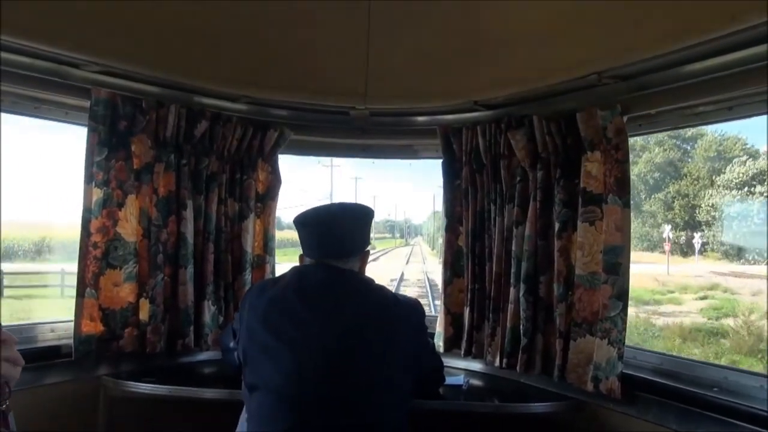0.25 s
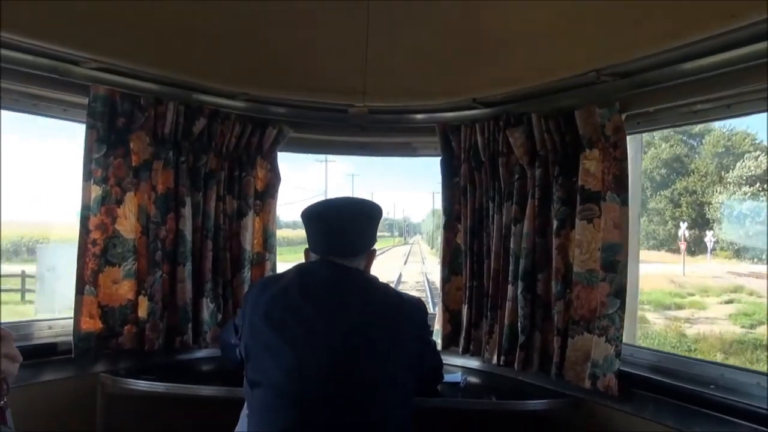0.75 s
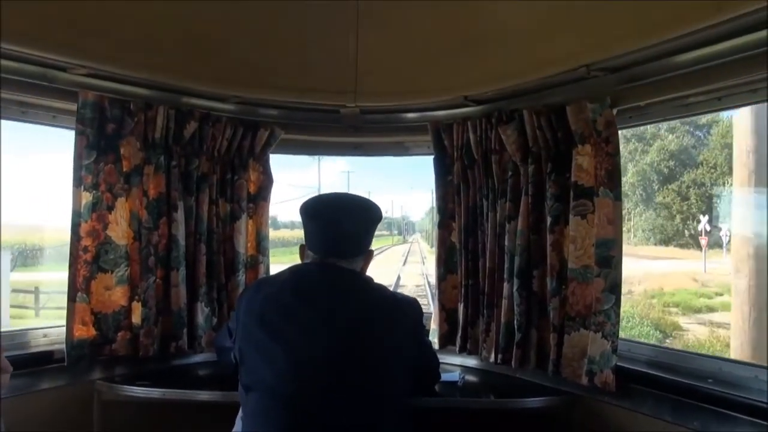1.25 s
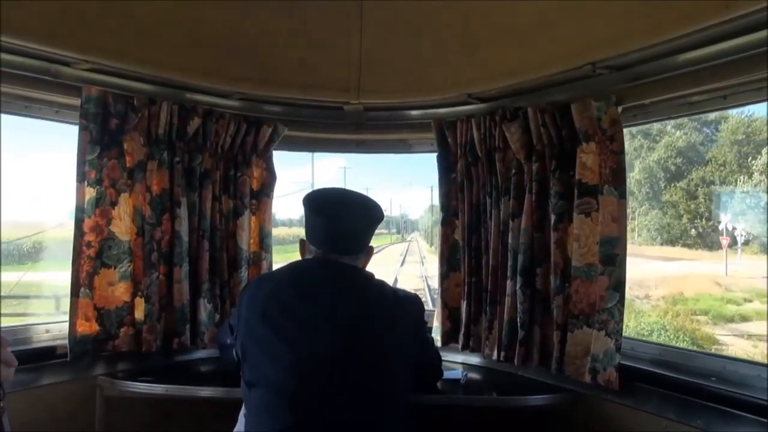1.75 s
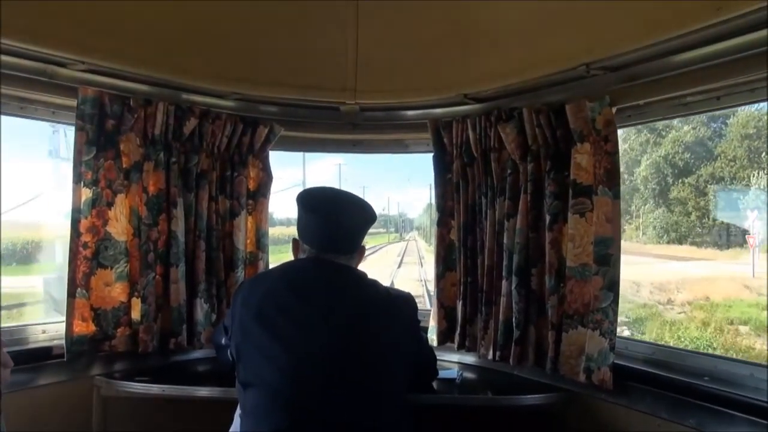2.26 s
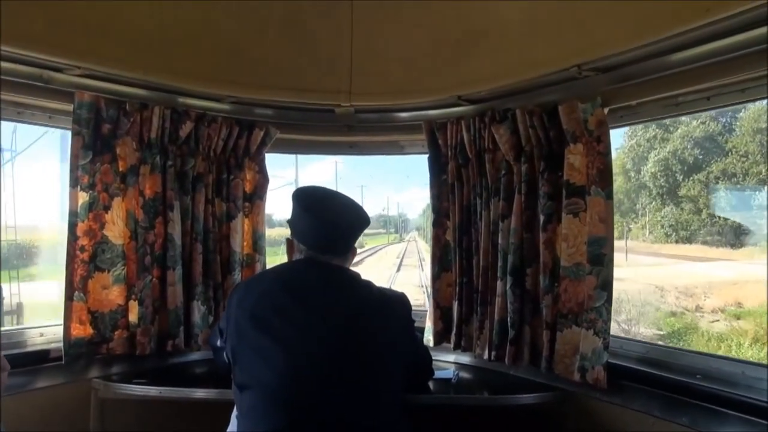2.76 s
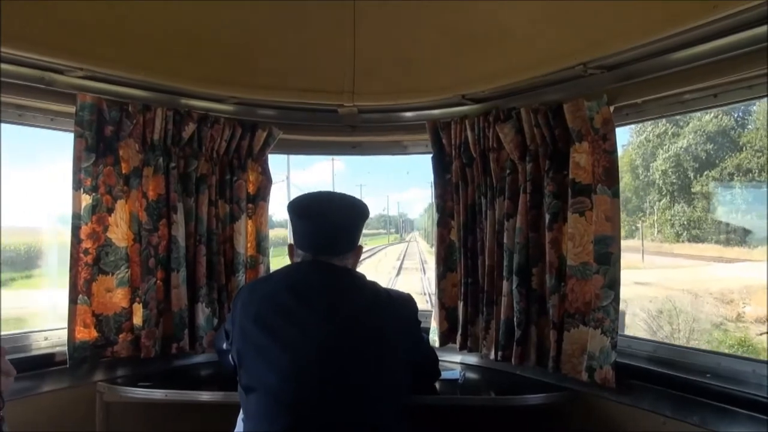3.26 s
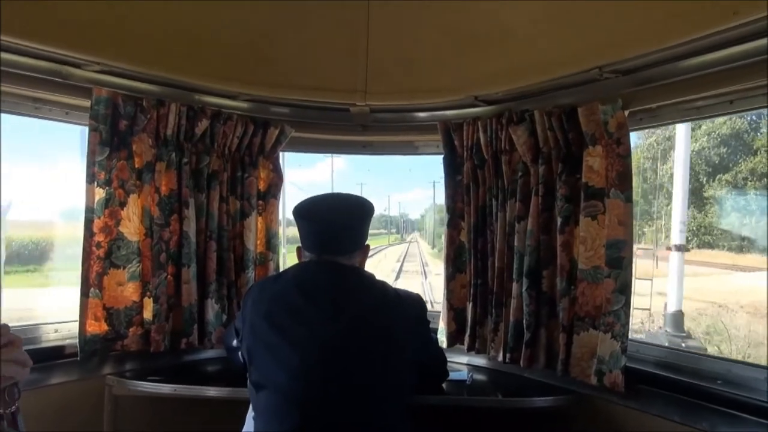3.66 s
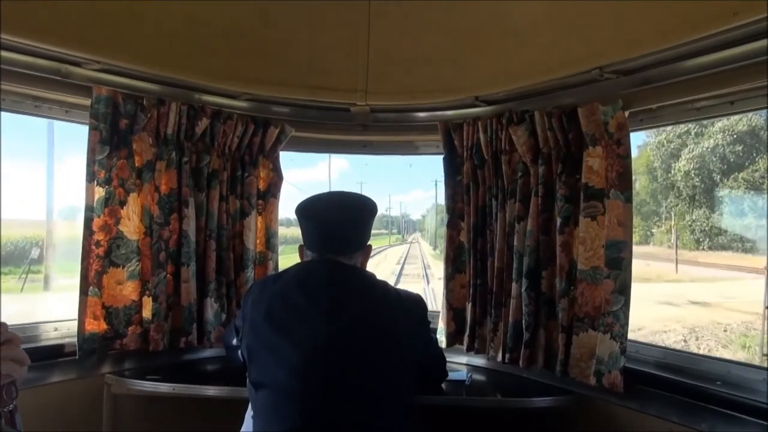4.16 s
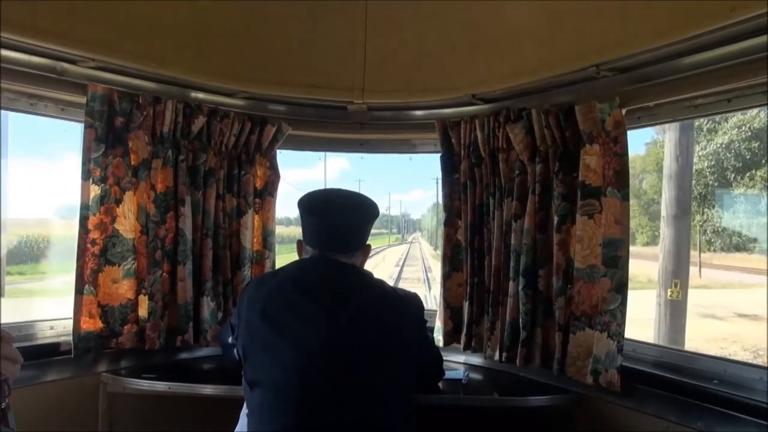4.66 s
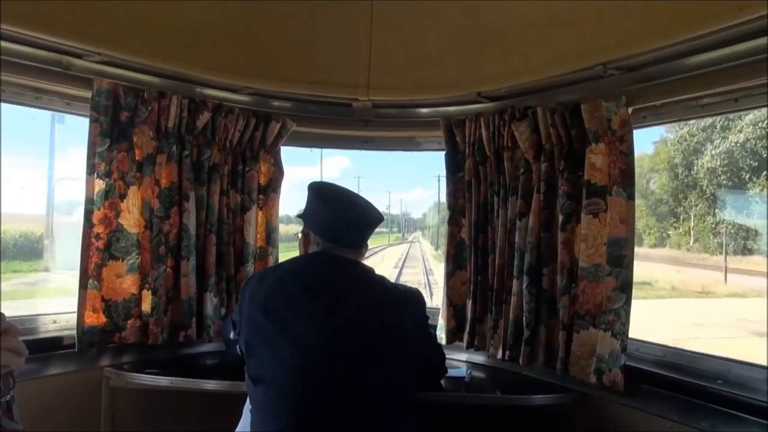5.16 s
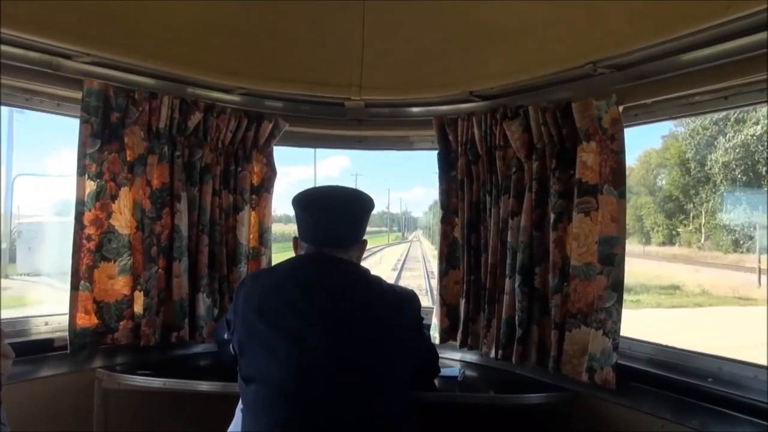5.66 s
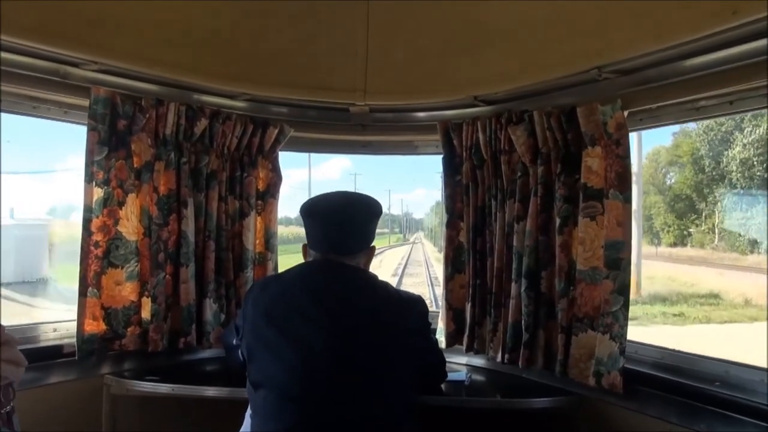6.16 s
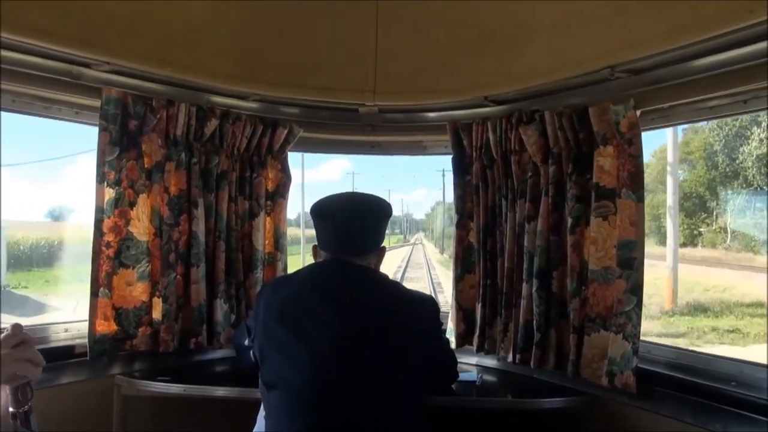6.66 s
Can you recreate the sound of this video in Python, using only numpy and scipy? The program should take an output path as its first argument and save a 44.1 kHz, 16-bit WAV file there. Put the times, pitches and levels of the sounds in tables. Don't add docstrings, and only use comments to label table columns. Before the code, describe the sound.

In a small railcar cab, compressed air rushes from the brake valve, already at full force, a bright sizzling hiss coloured by the close walls. It holds for a second or so, then steadily weakens to the end. Far beneath, a motor rises slightly in pitch and settles into a faint steady whine, with low wheel rumble and soft joint thuds. A small camera microphone listens from behind, almost centred.

```python
import sys
import numpy as np
from scipy import signal
from scipy.fft import rfft, irfft, next_fast_len
from scipy.io import wavfile
from scipy.ndimage import uniform_filter1d, map_coordinates

SR = 44100
rng = np.random.default_rng(int(sys.argv[2]) if len(sys.argv) > 2 else 0)


def to_wav(sig):
    pcm = np.clip(np.atleast_2d(sig), -1, 1) * 32767
    pcm = np.round(pcm).astype(np.int16)
    wavfile.write(sys.argv[1], SR, pcm.T)


def field_ratio(decibels):
    return 10 ** (np.asarray(decibels, dtype=float) / 20)


N = 305480
TIME = np.arange(N) / SR


def along(points, hz):
    point_hz, value = np.transpose(points)
    return np.interp(np.log(hz + 1), np.log(point_hz + 1), value)


def curves(rows):
    seconds, *columns = np.transpose(rows)
    return [np.interp(TIME, seconds, column) for column in columns]


def bump(x, centre, width):
    return np.exp(-((x - centre) / width) ** 2)


def unit(x):
    return x / np.sqrt(np.mean(x ** 2) + 1e-20)


def wobble(knots_per_s):
    knots = rng.standard_normal(int(N * knots_per_s / SR) + 4)
    return map_coordinates(knots, [TIME * knots_per_s])


def filtered(x, gain):
    size = next_fast_len(N + 8192)
    hz = np.fft.rfftfreq(size, 1 / SR)
    return irfft(rfft(x, size) * gain(hz), size)[..., :N]


# frequency in Hz, side minus mid in dB.
PORT_SIDE_DB = [(60, -25), (400, -22.5), (1200, -30.5), (3000, -26), (5500, -18.5), (7000, -17.5),
                (9000, -12), (11300, -10), (11800, -22), (15500, -29)]
# frequency in Hz, likeness of side to mid from -1 to 1 (above 0 pulls left).
PORT_LEAN = [(200, -.3), (5500, -0.22), (7500, 0.029), (11000, 0.45)]


def turbulence(patchy_db):
    z = signal.stft(rng.standard_normal((2, N)), nperseg=512)[2]
    patches = rng.standard_normal(z.shape[1:])
    patches = uniform_filter1d(patches, size=14, axis=0)
    patches = uniform_filter1d(patches, size=8, axis=1)
    mid, other = signal.istft(z * field_ratio(patchy_db * unit(patches)), nperseg=512)[1][:, :N]

    def lean(hz):
        return np.clip(along(PORT_LEAN, hz), -1, 1)

    def side_gain(hz):
        return field_ratio(along(PORT_SIDE_DB, hz))

    tied = filtered(mid, lambda hz: lean(hz) * side_gain(hz))
    free = filtered(other, lambda hz: np.sqrt(1 - lean(hz) ** 2) * side_gain(hz))
    side = tied + free
    return np.array([mid + side, mid - side])


def reflections(x, ripple_db):
    z = signal.stft(x, nperseg=2048)[2]
    comb = rng.standard_normal(z.shape[1:])
    for _ in range(2):
        comb = uniform_filter1d(comb, size=2, axis=0)
        comb = uniform_filter1d(comb, size=30, axis=1)
    return signal.istft(z * field_ratio(ripple_db * unit(comb)), nperseg=2048)[1][:, :N]


# time in seconds, jet level in dB.
VENT_DB = [(0, -31.5), (.1, -31.7), (.32, -31), (.42, -32), (.65, -31), (.85, -32), (1.3, -33), (2.0, -33),
           (2.6, -33.5), (3.4, -35.5), (4.1, -36), (4.7, -37.5), (5.35, -38.5), (6.93, -42)]
# frequency in Hz, density in dB per Hz.
JET_COLOUR = [(200, -27.5), (280, -26), (450, -10.5), (850, -30.5), (1100, -25.5), (1700, -22.5),
              (2700, -13), (4000, -5.5), (6000, -0.5), (7500, -5), (9500, -4.5), (12000, -8),
              (14000, -11.5), (15650, -18.0)]
# centre in Hz, width in Hz, gain in
# dB.
CAB_MODES = [(459, 104, -11.9), (792, 99, -4.0), (901, 292, 12.0), (1346, 342, 9.3), (1603, 155, 6.5),
             (1875, 174, 12.0), (2037, 176, 8.1), (2418, 89, 5.6), (2604, 88, 2.1), (3072, 61, -4.5),
             (3391, 41, 3.6), (3695, 94, -4.3), (4041, 91, -3.9), (4714, 249, -9.4), (4844, 434, 12.0),
             (4957, 187, -8.9), (5226, 94, -4.0), (5898, 499, -3.2), (6570, 82, -3.4), (7132, 125, -9.0),
             (7147, 435, 12.0), (7629, 63, -3.3), (8026, 83, 3.6), (8374, 267, 5.1), (8549, 107, -4.6),
             (10597, 224, 3.8), (11274, 194, -5.6), (11363, 359, 3.7),
             (5480, 160, 1.1), (6020, 92, 1), (6530, 120, 1.5), (7270, 66, 0.8), (8600, 120, 2.2),
              (9050, 82, 0.5), (9960, 630, 0.9), (11060, 100, 0.5)]


def brake_air():
    jet_db, = curves(VENT_DB)
    focus = bump(TIME, centre=2.2, width=1.2)
    edge_loss_db, body_loss_db = 0.9, 1
    opening_db, opening_s = 2.5, 0.4
    edge_db = opening_db * bump(TIME, 0, opening_s) - edge_loss_db * focus + 0.54 * wobble(5)
    body_db = 0.64 * wobble(4.08) - body_loss_db * focus

    def colour(hz):
        broad_db = along([(120, -56)] + JET_COLOUR, hz)
        modes_db = sum(db / (1 + (2 * (hz - centre_hz) / width_hz) ** 2)
                       for centre_hz, width_hz, db in CAB_MODES)
        return field_ratio(broad_db + modes_db)

    air = filtered(reflections(turbulence(patchy_db=0.61), ripple_db=1.41), colour)

    def above(corner_hz):
        return filtered(air, lambda hz: 1 - 1 / (1 + (hz / corner_hz) ** 8))

    def drift(db):
        return db - np.mean(db)

    body = air - above(3500)
    edge = above(9600)
    fizz = above(13000)
    core = air - body - edge
    edge = edge + (field_ratio(0.19 * drift(jet_db)) - 1) * fizz
    flutter_db = 0.16 * wobble(12) + 0.23 * wobble(30) + 0.36 * wobble(80)
    jet = core + field_ratio(drift(edge_db)) * edge + field_ratio(drift(body_db)) * body
    return field_ratio(jet_db + 0.62 + flutter_db) * jet / np.std(core)


# time in seconds, shaft rate in Hz.
SHAFT_HZ = [(0, 37.0), (.25, 37.15), (.33, 37.45), (.45, 38.05), (.6, 38.33), (.9, 38.4), (4.5, 38.39),
            (5.5, 38.37), (6.93, 38.36)]
# time in seconds, level of shaft order 9 in dB.
NINTH_DB = [(0, -73), (.2, -66.5), (.33, -57.5), (.75, -61.5), (1.1, -72), (1.6, -64.5), (2, -67.5),
            (2.3, -65.5), (2.9, -70.5), (3.4, -70), (3.9, -64.5), (4.6, -71), (5, -69.5), (5.5, -71.5),
            (6.2, -72), (6.93, -67)]


def motor():
    shaft_hz, = curves(SHAFT_HZ)
    ninth_db, = curves(NINTH_DB)
    swell_db = 4.5 * bump(TIME, centre=2.4, width=0.45)
    dip_db = 5 * bump(10 * shaft_hz, centre=374.8, width=4)
    tenth_db = -72.5 + swell_db + 2.4 * wobble(2.73) - dip_db - 0.53 * TIME
    panel_db = 11.5 * bump(18 * shaft_hz, centre=691, width=3.1)
    easing_db_per_s = 1.34
    eighteenth_db = -75.5 + panel_db - easing_db_per_s * TIME
    order_db = {9: ninth_db, 10: tenth_db, 18: eighteenth_db, 20: tenth_db - 4.0, 27: ninth_db - 18}

    shaft_angle = 2 * np.pi * np.cumsum(shaft_hz) / SR
    run_up = bump(TIME, centre=0.38, width=0.22)
    whine = 0
    for order, db in order_db.items():
        right_db = 0.91 + 0.37 * wobble(1.27) + 2.0 * run_up
        level = field_ratio(db + 0.49 * wobble(3.5)) * np.sqrt(2)
        tone = level * np.sin(order * shaft_angle + rng.uniform(0, 2 * np.pi))
        whine = whine + tone * field_ratio(np.array([-right_db, right_db]))
    return whine


# time in seconds, rumble level in dB.
RUMBLE_DB = [(0, -68), (.3, -73), (.75, -67), (.95, -72), (2.4, -71.5), (5.4, -73), (5.75, -80),
             (6.93, -81)]
# frequency in Hz, rumble density in dB per Hz.
RUMBLE_COLOUR = [(13, -40), (22, -10), (54, -0.5), (135, -2.5), (172, 0.5), (241, -15), (300, -2),
                 (390, -28), (660, -120)]
# time in seconds, peak level in dB, floor or fitting ring in Hz, 60 dB decay in seconds.
RAIL_JOINTS = [(.04, -65, 60, .2), (.6, -66, 147, .15), (.8, -56, 141, 0.15), (.85, -58, 62, 0.28),
               (1.14, -64, 129, .15), (1.92, -58.5, 171, 0.21), (2.15, -67, 167, .15),
               (3.22, -63, 189, 0.18), (3.28, -61, 121, .25), (3.64, -52, 160, 0.11),
               (3.69, -61.5, 71, 0.28), (4.4, -63, 161, 0.17), (4.565, -53, 1000, 0.15),
               (4.665, -61, 755, 0.15), (4.96, -61.5, 187, .3), (5.03, -63, 115, 0.22),
               (5.39, -62, 168, .2), (5.44, -63, 65, 0.27)]


def wheels():
    rumble_db, = curves(RUMBLE_DB)
    rumble = unit(filtered(turbulence(patchy_db=2.0), lambda hz: field_ratio(along(RUMBLE_COLOUR, hz))))
    thuds = np.zeros(N + SR)
    t = TIME[:SR // 2]
    for start_s, peak_db, ring_hz, t60_s in RAIL_JOINTS:
        ring = np.sin(2 * np.pi * ring_hz * t)
        ring += 0.61 * np.sin(2 * np.pi * 1.54 * ring_hz * t + rng.uniform(0, 2 * np.pi))
        decay = field_ratio(peak_db + 3.5 - 60 * t / t60_s)
        soft_onset = 1 - np.exp(-t / 0.01)
        thuds[round(start_s * SR):][:len(t)] += decay * soft_onset * ring
    return field_ratio(rumble_db + 0.4 * wobble(7)) * rumble + thuds[:N]


def scene():
    return brake_air() + motor() + wheels()


def roll_off(x):
    return signal.sosfilt(signal.butter(12, 15970, fs=SR, output="sos"), x)


# time in seconds, camera gain in dB.
FADE_DB = [(5.4, -1.5), (5.6, -3), (6.3, -4), (6.93, -6)]


def record(dry):
    fade_db, = curves(FADE_DB)
    top_hz = 15705
    mix = filtered(field_ratio(fade_db) * dry, lambda hz: hz < top_hz)
    return roll_off(mix)


dry = scene()
out = record(dry)
to_wav(out)
```